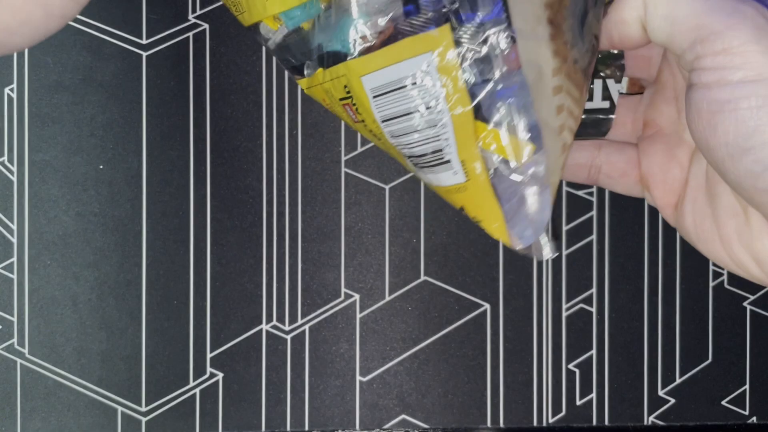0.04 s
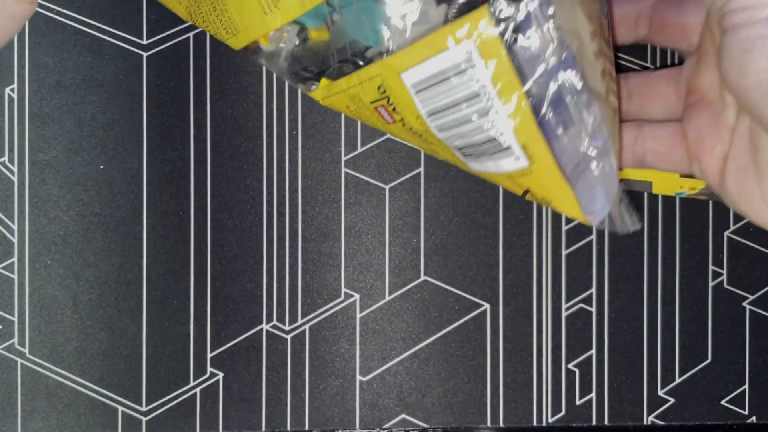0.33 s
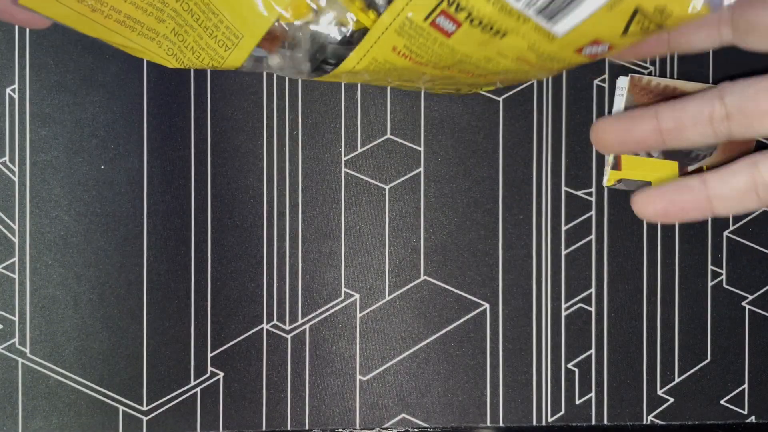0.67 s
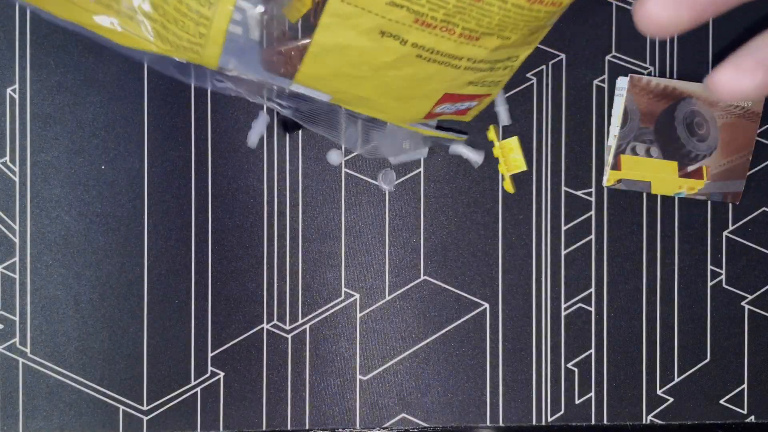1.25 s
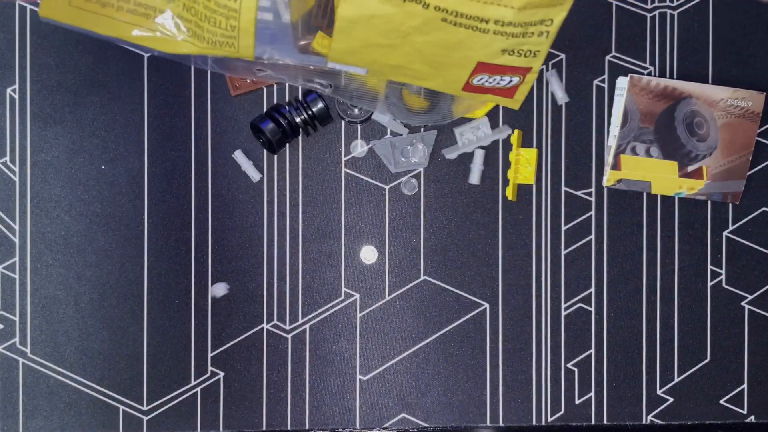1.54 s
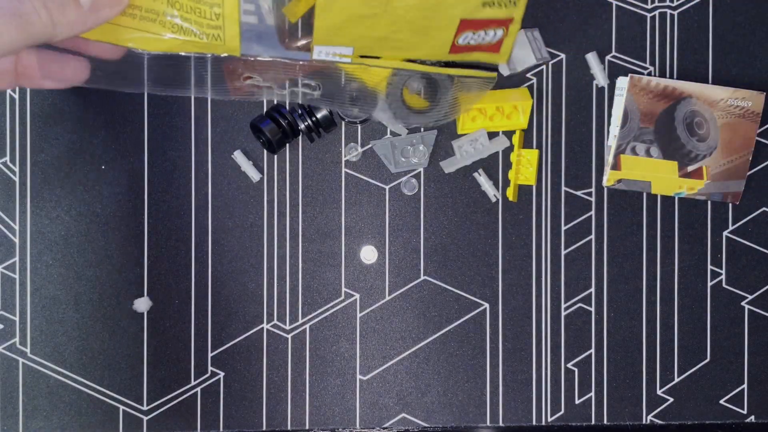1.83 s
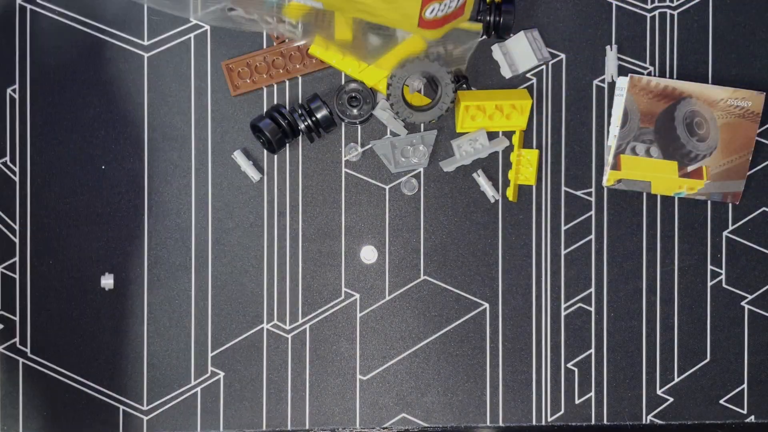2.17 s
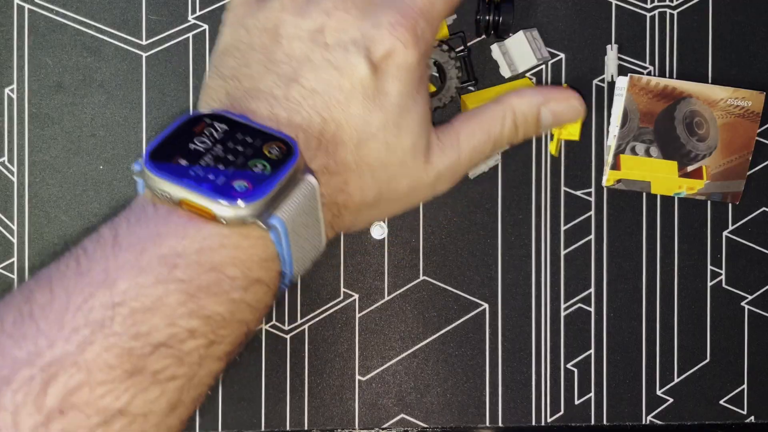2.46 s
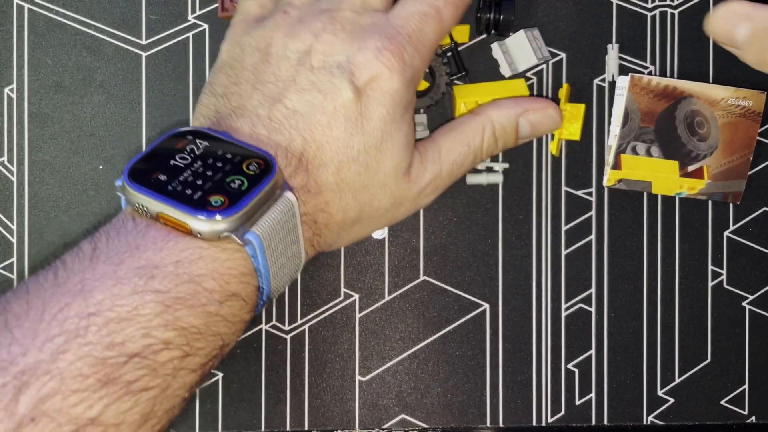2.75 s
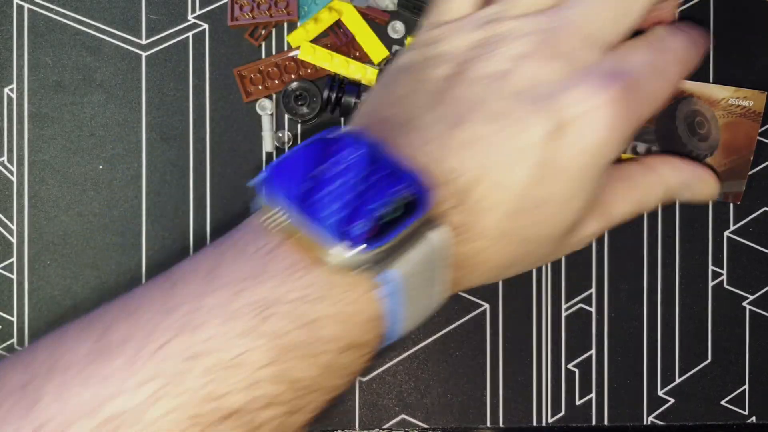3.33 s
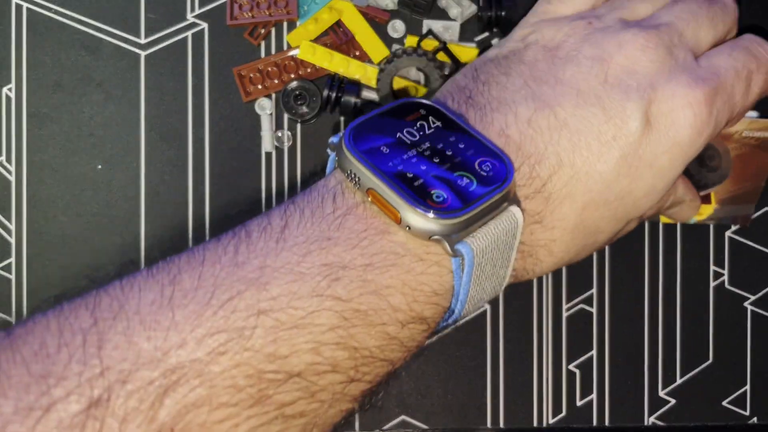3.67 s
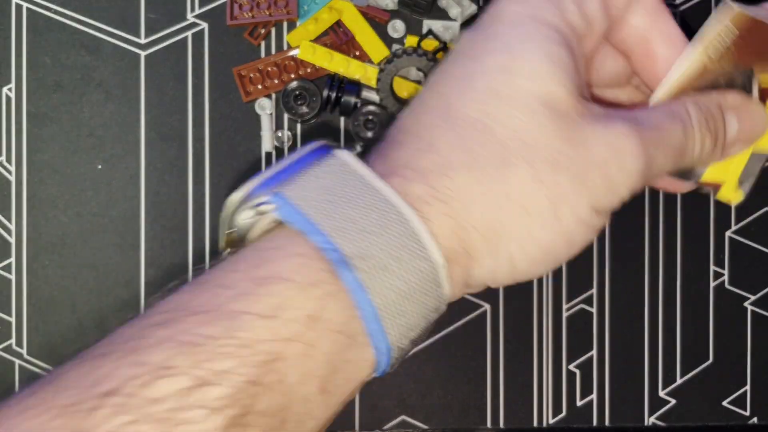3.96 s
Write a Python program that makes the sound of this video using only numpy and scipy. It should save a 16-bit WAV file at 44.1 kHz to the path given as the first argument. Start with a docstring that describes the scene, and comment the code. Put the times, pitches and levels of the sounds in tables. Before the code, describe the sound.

A thin plastic bag rustles as toy bricks spill onto a mat and click together.

```python
"""A table in a small, quiet room, heard from nearby on a closely spaced pair of microphones.
A thin plastic bag is tipped and shaken over a mat, and small hard bricks slide out of it.
The film rustles as its creases give way and snaps as its folds flip over; the bricks clatter
against each other, land softly and ring. Then a hand spreads the pile and slides over the mat."""
import sys
import numpy as np
from scipy import signal
from scipy.fft import rfft, irfft
from scipy.io import wavfile
from scipy.ndimage import uniform_filter1d

SR = 44100
rng = np.random.default_rng(int(sys.argv[2]) if len(sys.argv) > 2 else 0)


def dump_mix(stems):
    """Bounce the given channels to the path in sys.argv[1] as a 16-bit WAV at rate SR."""
    frames = np.atleast_2d(stems).T  # one column per channel
    limited = np.clip(frames, -1, 1)  # hard clip at full scale
    pcm = np.round(limited * 32767).astype(np.int16)
    wavfile.write(sys.argv[1], SR, pcm)


N = 176400
T = np.arange(N) / SR
BLOW_T = T[:SR // 8]

# brick hitting brick: t/s, relative level/dB, main ring f/Hz
BRICK_HITS = [(0.0251, -35, 8850), (0.0711, -31.5, 13900), (0.1895, -32.5, 7130), (0.385, -31.5, 7100),
              (0.54, -28.5, 8730), (0.602, -28, 8600), (0.617, -37, 8000), (0.7738, -33, 8460),
              (1.0885, -22, 8130), (1.1207, -24, 7500), (1.1555, -26, 7630), (1.221, -31.5, 9000),
              (1.2371, -26, 10800), (1.276, -32, 11000), (1.317, -27.5, 11020), (1.4022, -28, 11300),
              (1.4355, -24.5, 11250), (1.4671, -34.5, 11000), (2.412, -42, 8440), (2.422, -39, 7800),
              (2.472, -42, 5800), (2.496, -40.5, 5750), (2.514, -42, 5780), (2.5344, -35, 5780),
              (2.558, -36.5, 7940), (2.566, -40, 11640), (2.6352, -47, 5270), (2.692, -36.5, 6380),
              (2.704, -35.5, 6750), (2.709, -35, 5500), (2.712, -40.5, 5550), (2.746, -37.5, 8840),
              (2.8518, -37.5, 7760), (2.905, -47, 7600), (2.997, -45, 8500), (3.052, -48.5, 10760),
              (3.0994, -47.5, 7400), (3.127, -46.5, 7320), (3.1581, -41, 7230)]
# colour of a hard contact: f/Hz, level/dB
CONTACT_COLOUR = [(100, -4.5), (400, -9.5), (1500, -3), (3000, -15), (4800, -9.5), (5700, -3), (8500, 6),
                  (11000, -0.5), (13500, 0), (16000, -10)]
# bricks that bounce free and ring on, or bump on the mat: t/s, level/dB, f/Hz, t60/s
FREE_RINGS = [(0.766, -46.5, 7000, 0.33), (1.129, -41, 3410, 0.095), (1.165, -44, 5950, 0.24),
              (1.2083, -35, 5755, 0.15), (1.246, -34, 7500, 0.098), (1.25, -43, 296, 0.071),
              (1.278, -24.5, 7440, 0.019), (1.468, -49.5, 5755, 0.16), (1.565, -44, 5440, 0.11),
              (1.606, -35.5, 4230, 0.027), (2.422, -52, 5800, .2), (2.531, -53, 4460, 0.052),
              (2.536, -40, 5840, 0.13), (3.158, -61.5, 7450, 0.069)]
# bricks tumbling in the bag, then under the hand: t/s, relative level/dB
JOSTLE_CURVE = [(0, -41.5), (.16, -50.5), (.33, -43), (.43, -45.5), (.53, -38.5), (.58, -49.5), (.72, -39),
                (.8, -65), (.97, -48.5), (1.06, -37.5), (1.17, -37.5), (1.25, -38), (1.36, -63),
                (1.47, -54), (1.7, -85), (2.405, -82), (2.42, -43), (2.47, -54.5), (2.57, -46),
                (2.65, -55.5), (2.72, -43), (2.8, -50.5), (2.86, -46), (2.89, -60.5), (3.02, -64),
                (3.15, -61.5), (3.24, -67), (3.29, -105)]
# resonances of the bricks: f/Hz, relative level/dB, t60/s
BRICK_RESONANCES = [(3510, -18, 0.12), (4300, -13.5, 0.033), (5800, -11, 0.045), (5800, -2, 0.037),
                    (6540, -5.5, 0.0092), (7220, -7, 0.048), (8080, -3.5, 0.015), (8840, 5, 0.029),
                    (11220, -1.5, 0.02), (12500, -4, 0.016)]
# bricks landing on the mat: t/s, level/dB
LANDINGS = [(1.084, -47), (1.4445, -38), (1.552, -46), (1.654, -46), (2.185, -54), (2.332, -46)]
# colour of the mat on the table: f/Hz, level/dB
MAT_COLOUR = [(30, -15), (70, 7), (170, -2), (320, 1.5), (550, 9.5), (900, -21), (1600, -12), (16000, -43)]
# folds snapping over, with relative levels in three bands: t/s, body/dB, crack/dB, treble/dB
FOLD_SNAPS = [(0.054, -42, -32, -26), (0.2286, -49, -41, -28.5), (0.324, -41.5, -49, -40),
              (0.374, -53, -51, -41), (0.457, -50, -46, -40), (0.706, -47, -38.5, -44),
              (0.8116, -38.5, -36.5, -28), (0.8903, -43.5, -34.5, -28), (0.9185, -43, -34.5, -29),
              (0.9768, -43.5, -36.5, -27.5), (1.086, -38, -35, -24.5), (1.347, -43, -43, -48),
              (1.43, -41, -43, -43), (1.4447, -39, -32.5, -24.5), (1.462, -41.5, -38.5, -34),
              (1.52, -49, -40.5, -33.5), (1.553, -39, -38.5, -32.5), (1.5794, -46, -42.5, -33.5),
              (1.6071, -49, -40, -40), (1.6122, -49.5, -43.5, -32), (1.6232, -75, -67, -33.5),
              (1.647, -44, -41, -32), (1.6562, -44.5, -39, -29.5), (1.6804, -44, -40, -33),
              (1.7235, -45.5, -50.5, -46), (1.729, -50.5, -41, -33.5), (1.7534, -63, -39, -45),
              (1.7651, -43, -40.5, -32), (1.7699, -49.5, -39, -27.5), (1.783, -54, -46, -49),
              (1.7996, -57, -42, -40), (1.8078, -50, -45, -33), (1.8501, -44.5, -41, -32),
              (1.9136, -49, -48, -37), (1.9637, -55.5, -63, -48), (1.9772, -44.5, -41, -35),
              (2.0043, -55, -41.5, -32), (2.0395, -47.5, -42, -34), (2.0559, -54, -43, -41),
              (2.0813, -47.5, -48, -35.5), (2.089, -71, -45.5, -46), (2.1072, -69, -69, -42),
              (2.1296, -46, -41, -34), (2.173, -75, -49, -43), (2.1842, -51, -46, -39),
              (2.2584, -52, -45, -36), (2.2937, -52, -47.5, -49), (2.3342, -49.5, -58, -48.5),
              (2.359, -62, -49.5, -42.5)]
# colour of the snaps: f/Hz, level/dB
FOLD_COLOUR = [(100, -19), (500, -3), (1500, 6), (3000, -1.5), (4200, 2.5), (6500, 13), (9000, 5),
               (12000, -0.5), (16000, -4.5)]
# rustle of the bag: t/s, relative level/dB
RUSTLE_CURVE = [(0, -50), (.12, -53.5), (.22, -51.5), (.38, -47), (.43, -50.5), (.47, -47), (.55, -47.5),
                (.59, -51), (.67, -48), (.725, -47), (.745, -58), (.8, -54), (.84, -48.5), (.93, -46),
                (1, -50), (1.08, -47.5), (1.2, -62.5), (1.35, -52.5), (1.39, -56), (1.5, -57),
                (1.56, -51.5), (1.6, -61), (1.66, -52.5), (1.71, -65.5), (1.79, -54.5), (1.83, -66),
                (1.945, -66.5), (2, -61), (2.3, -65.5), (2.4, -94.5)]
# colour of the rustle: f/Hz, level/dB
FILM_COLOUR = [(40, -25.5), (100, 2.5), (200, -3), (420, 6.5), (800, -0.5), (1500, -3), (3000, 0.5),
               (5000, -1.5), (7000, -1), (9000, -1), (12000, -3), (16000, -10)]
# popping wrinkles, relative to the rustle curve: t/s, level/dB
WRINKLE_SHARE = [(.6, -.5), (1.1, -2), (1.8, -1)]
# hand and arm sliding over the mat: t/s, level/dB
SLIDE_CURVE = [(2.39, -100), (2.43, -57.5), (2.75, -59.5), (2.92, -64.5), (3.16, -71.5), (3.26, -87),
               (3.41, -101), (3.43, -66), (3.52, -87.5), (3.6, -63), (3.68, -70.5), (3.84, -66)]
# colour of the sliding: f/Hz, level/dB
SKIN_COLOUR = [(40, -6), (130, 13), (260, 22), (450, 7.5), (900, 2), (1550, 11.5), (2300, 2.5), (5000, 7),
               (8000, 5), (16000, 4.5)]
# the hand tapping the pile: t/s, relative level/dB
HAND_TAPS = [(2.938, -51.5), (3.066, -51), (3.141, -57), (3.777, -45.5)]
# reverberation of the room: f/Hz, t60/s
ROOM_DECAY = [(100, 0.99), (600, 0.15), (16000, 0.055)]
# colour of the room tone: f/Hz, level/dB
ROOM_TONE_COLOUR = [(25, -21), (60, 5), (130, -0.5), (260, -7), (500, -12.5), (1000, -32.5), (4000, -47.5)]
# lead of the left microphone over the right: f/Hz, phase/rad
MIC_PHASE = [(30, 0), (300, -.2), (600, -1.1), (1000, .1), (2200, .05), (3000, .9), (4300, .9), (4800, 3),
             (5100, 5.7), (6000, 6.9), (8000, 8.3), (10000, 9.45), (12000, 10.8), (14700, 12.5)]
# likeness of the two microphones: f/Hz, correlation/0..1
MIC_LIKENESS = [(100, .99), (400, .93), (720, .68), (1200, .96), (2000, .98), (3100, .6), (4000, .77),
                (4800, .45), (5600, .88), (8000, .9), (10300, .99), (13400, .77), (15500, .97)]
# left microphone minus right: f/Hz, level/dB
MIC_BALANCE = [(150, 0), (480, 3.5), (820, -8), (1200, -1), (2000, -.5), (2900, -3), (4600, -3), (5300, 1),
               (7000, 0)]

CONTACT_S, FLURRY_S = 0.0016, 0.007  # decay of a hard contact; scatter either side of a snap
TOP_HZ = 16150


def brick_clicks(ring_s=0.0043, detune_hz=132):
    """Hard contacts crack and ring a close pair of modes and a lower wall mode; free bricks ring on."""
    cracks, rings = np.zeros(N), np.zeros(N)
    envelope = np.exp(-BLOW_T / ring_s) * (1 - np.exp(-2 * BLOW_T / CONTACT_S))
    for s, db, hz in BRICK_HITS:
        add(cracks, s, 2 * amp(db - 6) * burst(CONTACT_S, tail_s=0.006, tail_db=-14))
        twin_hz = hz + detune_hz * rng.standard_normal()
        pair = np.sin(2 * np.pi * hz * BLOW_T) + .5 * np.sin(2 * np.pi * twin_hz * BLOW_T)
        wall = amp(-10) * np.sin(2 * np.pi * hz * rng.uniform(.55, .8) * BLOW_T)
        add(rings, s, amp(db + 1) * (pair + wall) * envelope)
    for s, db, hz, t60 in FREE_RINGS:
        add(rings, s, amp(db) * mode(hz, t60))
    return colour(cracks, CONTACT_COLOUR) + rings


def brick_jostle(knocks_per_s=650, size_spread=.018, palm_from_s=2.4, palm_hz=6100, palm_db_per_oct=7.5):
    """Many light knocks between bricks, each ringing one mode at a pitch set by the size of its brick."""
    effort, hits, rings = level(JOSTLE_CURVE), np.zeros(N), np.zeros(N)
    count = len(BRICK_RESONANCES)
    for hz, db, t60 in BRICK_RESONANCES:
        knocks = grains(knocks_per_s / count, spread_db=2.3) * effort / np.sqrt(count)
        # the palm over the pile damps the upper modes
        palm = amp(-palm_db_per_oct * max(np.log2(hz / palm_hz), 0))
        knocks *= np.where(T > palm_from_s, palm, 1)
        knock_index = np.cumsum(knocks != 0)
        pitch = hz * (1 + size_spread * rng.standard_normal(N)[knock_index])
        decay = np.exp(-np.log(1000) / (t60 * SR))
        swing = signal.lfilter([np.sqrt(2 * (1 - decay ** 2))], [1, -decay], knocks + 1e-20)
        rings += amp(db) * swing * np.sin(2 * np.pi * np.cumsum(pitch) / SR)
        hits += knocks
    # every knock also gives a short tick of noise
    fade = 1 / (CONTACT_S * SR)
    tick_power = signal.lfilter([fade], [1, -np.exp(-fade)], hits ** 2 + 1e-20)
    ticks = np.sqrt(tick_power) * rng.standard_normal(N)
    return amp(-4) * colour(ticks, CONTACT_COLOUR) + amp(1) * rings


def mat_thuds():
    """Bricks land on the soft mat with dull blows."""
    blows = np.zeros(N)
    for s, db in LANDINGS:
        add(blows, s, amp(db) * burst(decay_s=0.0053))
    return colour(blows, MAT_COLOUR)


def bag_snaps(edges_hz=(167, 1370, 4640, TOP_HZ), band_gains_db=(5.5, 4, -4)):
    """Large folds flip over, each with its own share of body, crack and treble."""
    out = np.zeros(N)
    cracks = [fold_flurry() for _ in FOLD_SNAPS]
    for k, gain_db in enumerate(band_gains_db):
        band = np.zeros(N)
        for (s, *band_db), crack in zip(FOLD_SNAPS, cracks):
            add(band, s - FLURRY_S, amp(band_db[k] + gain_db) * crack)
        low, high = edges_hz[k:k + 2]
        bandpass = signal.butter(2, [low, high], "band", fs=SR, output="sos")
        out += signal.sosfilt(bandpass, band + 1e-12 * rng.random(N)) * np.sqrt(2 * SR / (high - low))
    return colour(out, FOLD_COLOUR)


def fold_flurry(decay_s=0.0014):
    """A fold gives way in steps: one main crack at FLURRY_S, with three weaker ones around it."""
    out = np.zeros(len(BLOW_T))
    add(out, FLURRY_S, burst(decay_s, tail_s=0.0047, tail_db=-23))
    for s in rng.uniform(0, 2 * FLURRY_S, size=3):
        add(out, s, amp(-11) * burst(decay_s / 2))
    return out


def bag_rustle(clump_s=.007, clump_db=3.5, slack_top_hz=2980, crisp_above_db=-52):
    """Thousands of tiny creases give way in clumps; a gently moved film loses its treble."""
    clumps = unit(uniform_filter1d(rng.standard_normal(N), int(clump_s * SR)))
    effort = level(RUSTLE_CURVE)
    creases = unit(grains(per_s=6000, spread_db=1.5) * amp(clump_db * clumps)) * effort
    slack = signal.lfilter(*signal.butter(1, slack_top_hz, fs=SR), creases)
    crispness = np.minimum(effort / amp(crisp_above_db), 1)
    return amp(5) * colour(slack + crispness * (creases - slack), FILM_COLOUR)


def bag_crackle(pops_per_s=350, range_hz=(900, 7000), pitches=10):
    """Single wrinkles pop, each a cycle or two at one of several pitches."""
    out = np.zeros(N)
    for hz in np.geomspace(*range_hz, pitches):
        pop = mode(hz, t60=6 / hz)
        wrinkles = grains(pops_per_s / pitches, spread_db=3)
        out += signal.oaconvolve(wrinkles, pop[:SR // 100] / np.linalg.norm(pop))[:N]
    return unit(out) * level(RUSTLE_CURVE) * level(WRINKLE_SHARE)


def hand(tap_band_hz=(550, 6000)):
    """Skin taps the pile and rubs over the mat."""
    taps = np.zeros(N)
    for s, db in HAND_TAPS:
        add(taps, s, 2 * amp(db) * burst(decay_s=0.0018))
    taps = signal.lfilter(*signal.butter(1, tap_band_hz, "band", fs=SR), taps + 1e-15)
    friction = grains(per_s=1400, spread_db=1) * level(SLIDE_CURVE)
    return taps + colour(friction, SKIN_COLOUR)


def room_reverb(x):
    """The small room answers with a diffuse tail that lasts longest in the bass."""
    hz, t, noise = signal.stft(rng.standard_normal(SR // 2), SR, nperseg=256)
    decay = amp(-60 * t / read(ROOM_DECAY, hz)[:, None])
    tail = signal.istft(noise * decay, SR, nperseg=256)[1]
    tail[:SR // 250] = 0  # 4 ms until the first reflection
    return signal.oaconvolve(x, tail / np.linalg.norm(tail))[:N]


def room_tone(level_db=-65):
    """Faint, low, steady noise behind everything."""
    return amp(level_db) * unit(colour(rng.standard_normal(N), ROOM_TONE_COLOUR))


def amp(db):
    """Decibels to gain."""
    return 10 ** (np.asarray(db) / 20)


def unit(x):
    """Scales to rms 1."""
    return x / np.sqrt(np.mean(x ** 2) + 1e-20)


def read(points, hz):
    """Interpolates a table on a log-frequency axis."""
    f, value = np.transpose(points)
    return np.interp(np.log(hz + 1), np.log(f), value)


def level(points):
    """A level curve as gain per sample."""
    return amp(np.interp(T, *np.transpose(points)))


def add(mix, s, sound):
    """Mixes a sound in at time s."""
    part = mix[max(round(s * SR), 0):][:len(sound)]
    part += sound[:len(part)]


def colour(x, points, size=4096):
    """Minimum-phase filter with the given spectrum that keeps the power of white noise."""
    gain = unit(amp(read(points, abs(np.fft.fftfreq(size, 1 / SR)))))
    response = np.exp(np.conj(signal.hilbert(np.log(gain))))
    return signal.oaconvolve(x, np.fft.ifft(response).real[:size // 2])[:N]


def burst(decay_s, tail_s=1, tail_db=-200, rise_s=0.00061):
    """A pitchless crack with an optional tail; edges meet and folds flip over a short rise time."""
    t = T[:SR // 16]
    shape = np.hypot(np.exp(-t / decay_s), amp(tail_db) * np.exp(-t / tail_s)) * (1 - np.exp(-t / rise_s))
    noise = rng.standard_normal(len(t)) * np.sqrt(shape)
    whitened = irfft(np.exp(1j * np.angle(rfft(noise))))
    return unit(whitened * np.sqrt(shape)) * np.sqrt(2 * np.mean(shape ** 2))


def grains(per_s, spread_db):
    """Random impulses of uneven size and random sign, rms 1."""
    chance, out = rng.random(N) * SR / per_s, np.zeros(N)
    at = np.flatnonzero(chance < 1)
    size = np.minimum(-np.log(chance[at] + 1e-12), 4)
    out[at] = (-1.) ** at * amp(spread_db * size)
    return unit(out)


def mode(hz, t60):
    """One dying partial."""
    onset = np.minimum(np.arange(len(BLOW_T)) / 20, 1)
    return amp(-60 * BLOW_T / t60) * np.sin(2 * np.pi * (hz * BLOW_T + rng.random())) * onset


def varied(x, depth_db, size=256):
    """Every fold or contact favours pitches of its own: random patches in time and frequency."""
    spectra = signal.stft(x, nperseg=size)[2]
    patches = uniform_filter1d(rng.standard_normal(spectra.shape), size=4, axis=0)
    patches = unit(uniform_filter1d(patches, size=4, axis=1))
    gain = unit(amp(depth_db * np.clip(patches, -2, 2)))
    return signal.istft(spectra * gain, nperseg=size)[1][:N]


def table_top():
    """Bag, bricks and hand close up, with a little of the room behind them."""
    bag_and_mat = varied(bag_rustle() + bag_crackle() + bag_snaps(), depth_db=2.5) + mat_thuds()
    pile = brick_clicks() + varied(brick_jostle() + hand(), depth_db=4)
    reverb = room_reverb(amp(-19) * bag_and_mat + amp(-16.5) * pile)
    return bag_and_mat + pile + reverb + room_tone()


def microphone_pair(shared, right_only):
    """Two close microphones: alike in the bass, with delay and imbalance higher up."""
    hz = np.fft.rfftfreq(2 * N, 1 / SR)
    left, detail = rfft(shared, 2 * N), rfft(right_only, 2 * N)
    likeness = np.clip(read(MIC_LIKENESS, hz), 0, 1)
    tilt = amp(read(MIC_BALANCE, hz) / 2)
    lag = np.exp(-1j * read(MIC_PHASE, hz))
    right = (likeness * left + np.sqrt(1 - likeness ** 2) * detail) * lag
    return irfft(np.array([left * tilt, right / tilt]))[:, :N]


def scene():
    """Both microphones share most of the sound; the rest differs in its fine detail."""
    return microphone_pair(table_top(), table_top())


def record(dry):
    """The recorder cuts the treble above TOP_HZ."""
    lowpass = signal.firwin(255, TOP_HZ, window=("kaiser", 8), fs=SR)
    return signal.oaconvolve(dry, lowpass[None], "same")


dry = scene()
out = record(dry)
dump_mix(out)
```